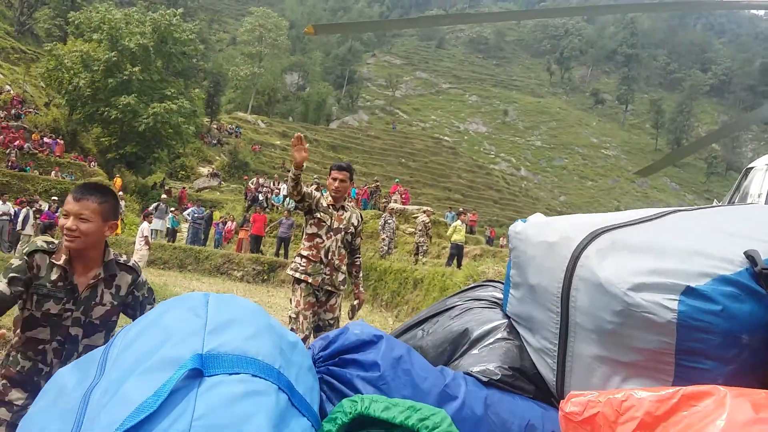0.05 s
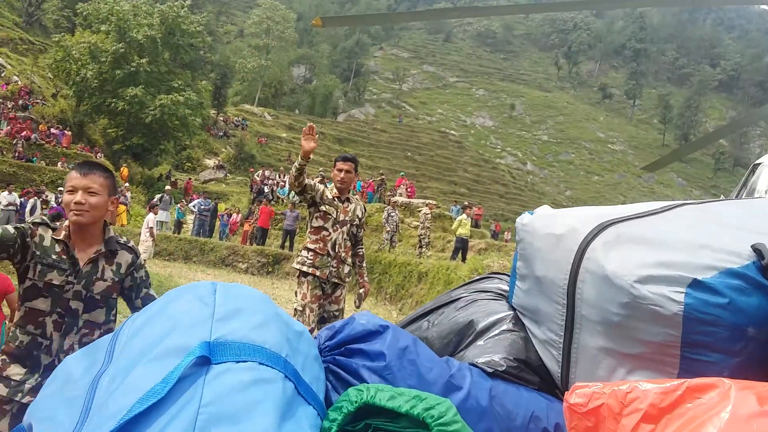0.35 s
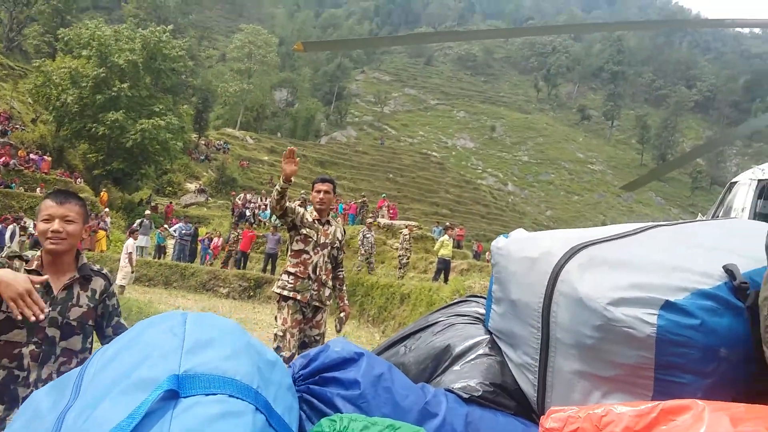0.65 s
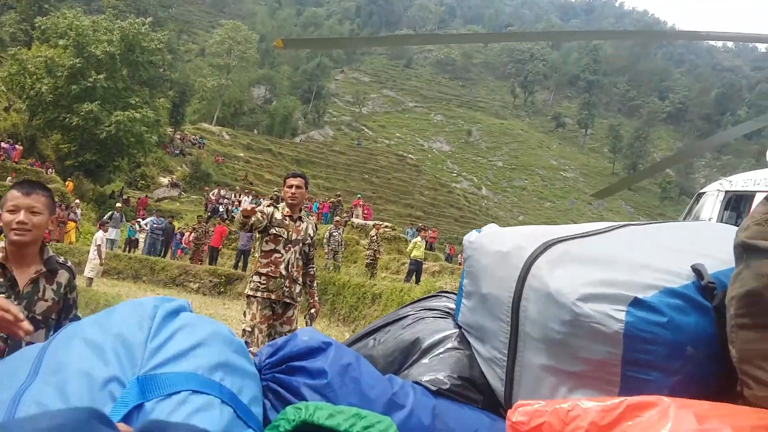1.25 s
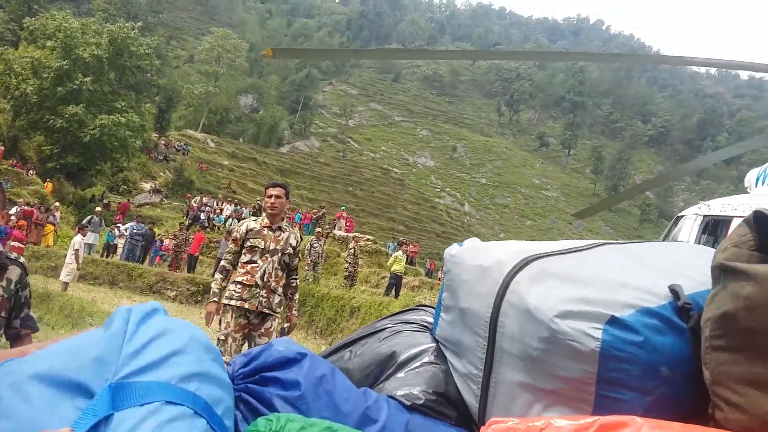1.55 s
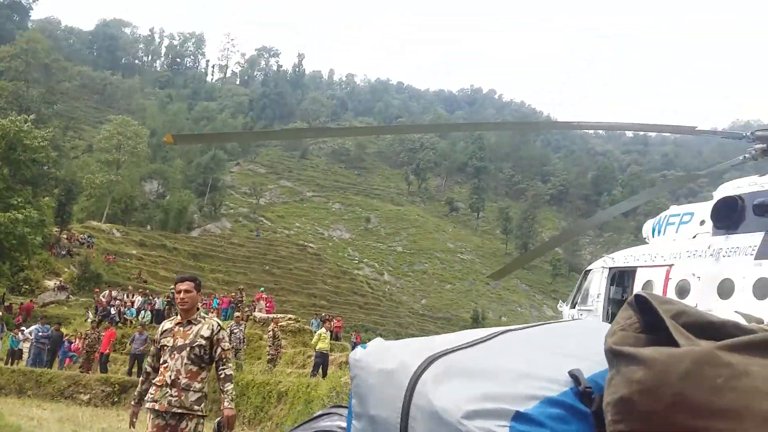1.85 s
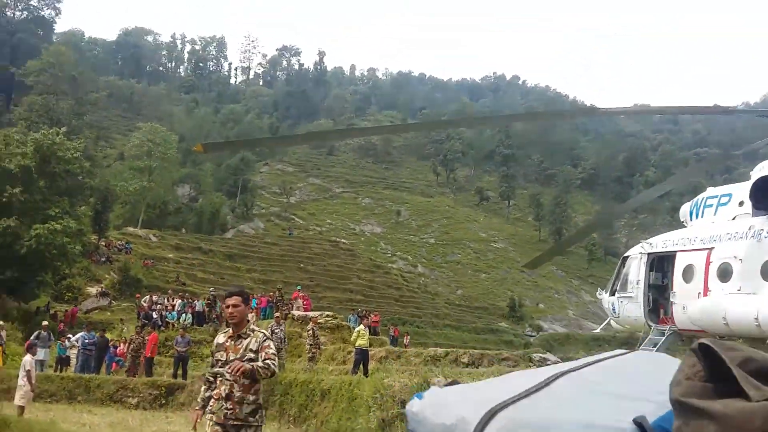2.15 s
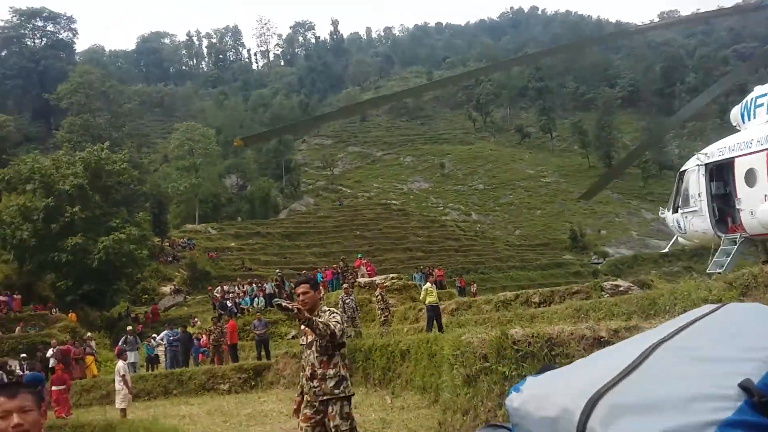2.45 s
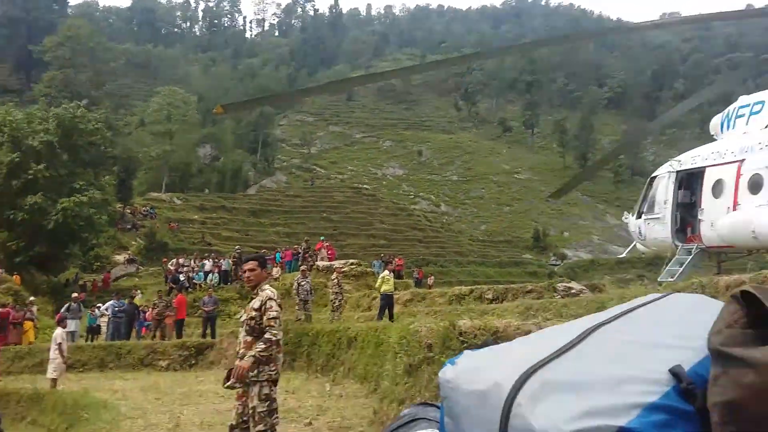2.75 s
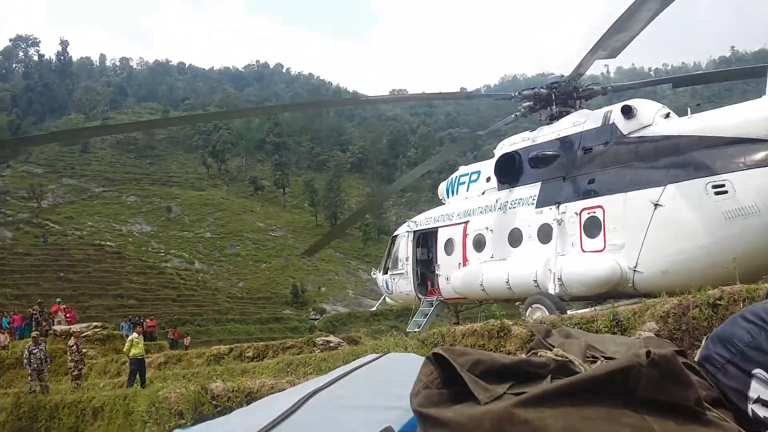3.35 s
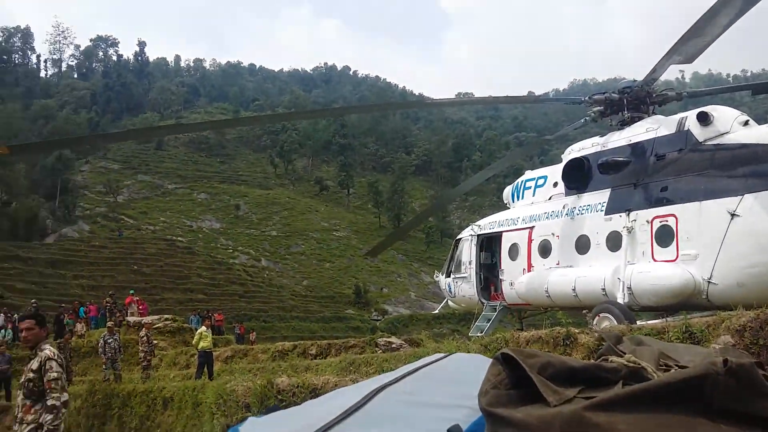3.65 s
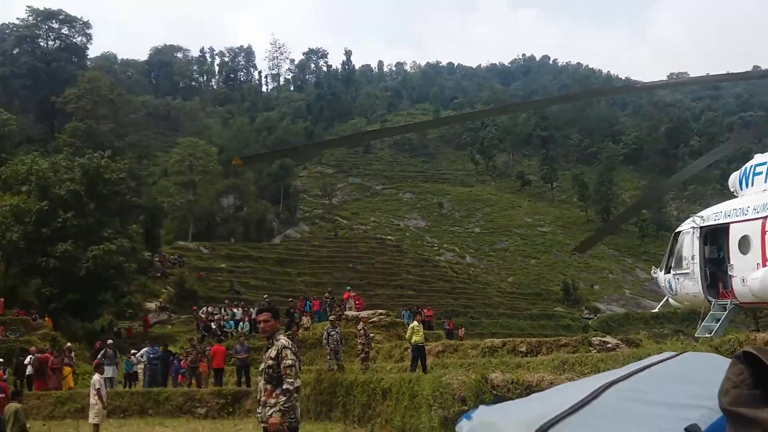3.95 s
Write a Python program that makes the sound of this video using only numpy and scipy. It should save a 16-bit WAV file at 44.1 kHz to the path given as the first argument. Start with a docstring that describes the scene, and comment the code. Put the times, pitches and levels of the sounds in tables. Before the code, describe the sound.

A helicopter's turbine exhaust roars loudly nearby for all four seconds, with a high hiss that swells and fades. At about 0.8 seconds a breathy whistle briefly slides down. From roughly 1.7 to 3.1 seconds the roar changes tone as the microphone turns toward the machine. Underneath are a faint gearbox hum and a low rotor wind rumble, with soft puffs on the microphone between 1 and 3.2 seconds.

```python
"""A helicopter's exhaust roars as it stands on a hillside, heard from behind a pile of luggage.
The roar changes tone as the microphone turns towards the machine and short echoes off the bags
and the ground move. The turbine intakes hiss, and a breathy whistle briefly slides down.
Underneath, the gearbox hums faintly and air pushed by the rotor puffs on the microphone."""
import sys
import numpy as np
from scipy import signal
from scipy.fft import rfft, irfft, next_fast_len
from scipy.io import wavfile
from scipy.ndimage import uniform_filter1d, map_coordinates

SR = 44100
rng = np.random.default_rng(int(sys.argv[2]) if len(sys.argv) > 2 else 0)


def master(y):
    """Save y as 16-bit WAV."""
    cut = np.clip(np.atleast_2d(y).T, -1, 1)
    pcm = np.round(cut * 32767)  # scale
    wavfile.write(sys.argv[1], SR, pcm.astype(np.int16))


N = 176400


def amp(db):
    """Turn a level in decibels (dB) into a number to multiply by."""
    return 10 ** (np.asarray(db) / 20)


def unit(x):
    """Scale a signal so that its average strength (rms) is 1."""
    return x / np.sqrt(np.mean(x ** 2) + 1e-20)


def along(points, hz):
    """Read between (frequency, value) points, giving each octave about the same room."""
    point_hz, values = np.transpose(points)
    return np.interp(np.log(hz + 1), np.log(point_hz + 1), values)


def curves(rows):
    """Join rows that start with a time into one curve per remaining column, a value per sample."""
    seconds, *columns = np.transpose(rows)
    return [np.interp(np.arange(N) / SR, seconds, column) for column in columns]


def wobble(per_s):
    """A smooth random curve that passes through per_s new values each second."""
    return map_coordinates(rng.standard_normal(1024), [np.arange(N) * per_s / SR], mode="mirror")


def filtered(x, response):
    """Turn each frequency in x up or down by the gain that response gives it."""
    size = next_fast_len(N + 8192)
    return irfft(rfft(x, size) * response(np.fft.rfftfreq(size, 1 / SR)), size)[..., :N]


def rush(tone, patchy_db):
    """Swirling air: noise with the given tone and random louder and softer patches, at strength 1."""
    spectrum = signal.stft(rng.standard_normal(N), nperseg=512)[2]
    patches = uniform_filter1d(rng.standard_normal(spectrum.shape), size=6, axis=0)  # blur in frequency
    patches = uniform_filter1d(patches, size=16, axis=1)  # blur in time
    noise = signal.istft(spectrum * amp(patchy_db * unit(patches)), nperseg=512)[1][:N]
    return unit(filtered(noise, lambda hz: amp(along(tone, hz))))


def delayed(x, lag_ms):
    """The same sound heard a little later; the delay may change as it plays."""
    return map_coordinates(x, [np.arange(N) - lag_ms * SR / 1000], mode="mirror")


def gearbox(waver=.7):
    """The gearbox hums a few faint tones that waver in loudness and pitch."""
    # Each row: pitch in Hz, level in dB.
    tones = [(296, -47), (331, -45.5), (640, -52)]
    t = np.arange(N) / SR
    hum = np.zeros(N)
    for hz, db in tones:
        swell = amp(2.2 * wobble(per_s=7.16))
        phase = 2 * np.pi * hz * t + waver * wobble(per_s=9.9)
        hum += amp(db) * unit(swell * np.sin(phase))
    return hum


def rotor_wash(rumble_db=-43):
    """Air pushed by the rotor makes a low, lumpy rumble and brief puffs on the microphone."""
    # The tone of the rumble. Each row: frequency in Hz, relative level in dB.
    tone = [(15, -36), (45, -26), (68, -3.5), (110, -1), (160, -5.5), (260, -14.5), (800, -50)]
    # Each row: time of a puff's peak in seconds, level in dB, half its length in seconds.
    puff_list = [(0.984, -36, 0.089), (1.12, -40, .02), (1.366, -32.5, .02), (1.925, -37, 0.022),
                 (2.11, -30, 0.017), (3.19, -33, 0.038)]
    t = np.arange(N) / SR
    puffs = sum(amp(db) * np.exp(-.5 * ((t - peak_s) / half_s) ** 2) for peak_s, db, half_s in puff_list)
    rumble = rush(tone, patchy_db=0.5)
    lumps = amp(rumble_db + 3.4 * wobble(per_s=24))
    return rumble * np.hypot(lumps, puffs)  # their powers add


def falling_whistle(width_hz=110):
    """A narrow band of the roar briefly slides down in pitch, like a breathy whistle."""
    # Each row: time in seconds, centre pitch in Hz, level in dB.
    glide = [(.68, 3150, -45), (.75, 3030, -27), (.8, 2860, -21.5), (.85, 2690, -22), (.89, 2620, -45)]
    hz, level_db = curves(glide)
    slow_noise = filtered(rng.standard_normal((2, N)), lambda f: 1 / (1 + (f / width_hz) ** 2))
    phase = 2 * np.pi * np.cumsum(hz) / SR
    whistle = slow_noise[0] * np.cos(phase) + slow_noise[1] * np.sin(phase)  # lift the noise to the pitch
    return unit(whistle) * amp(level_db)


def intake_hiss(flutter_db=0.58):
    """The turbine intakes hiss in three bands that swell and fade, sharing a flutter and an echo."""
    # How each band swells. Each row: time in seconds, level in dB before the band's offset is added.
    low_levels = [(0.0, -17.5), (0.21, -23.5), (0.37, -19.5), (0.42, -27), (0.52, -19.5), (1.5, -21.5),
                  (1.64, -24), (1.93, -16.5), (1.97, -18), (2.04, -14.5), (2.31, -19), (2.66, -22),
                  (2.71, -25.5), (2.9, -24), (3.16, -13.5), (3.72, -23), (3.92, -16), (4.0, -22)]
    main_levels = [(0.0, -16), (0.02, -19), (0.13, -16), (0.3, -20), (0.44, -16.5), (0.58, -20),
                   (0.63, -15), (0.81, -16.5), (0.87, -11.5), (1.27, -12.5), (1.34, -9.5), (1.41, -15),
                   (1.98, -12), (2.03, -16), (2.09, -13), (2.63, -14.5), (2.71, -19), (2.77, -17),
                   (2.85, -21), (3.12, -11), (3.45, -17), (3.54, -12.5), (3.71, -24), (3.77, -16.5),
                   (3.93, -14.5), (4.0, -15.5)]
    top_levels = [(0.0, -32), (0.01, -29), (0.61, -31), (1.0, -24), (1.48, -27), (1.96, -23.5), (2.07, -28),
                  (2.23, -22), (2.41, -24), (2.49, -31), (2.57, -25), (2.95, -29), (2.97, -24), (2.99, -29),
                  (3.48, -29), (3.58, -28), (3.65, -32), (4.0, -31)]
    # The tone of each band. Each row: frequency in Hz, relative level in dB.
    low_tone = [(3000, -48), (4600, -17), (5500, -8), (6200, -1.5), (7100, 1), (7800, -3.5), (9000, -29),
                (12000, -60)]
    main_tone = [(4500, -29), (6800, -19.5), (7700, -1.5), (8400, 0.5), (9800, -1), (11000, -5.5),
                 (12000, -10), (13200, -26), (16000, -45)]
    top_tone = [(9000, -48), (11800, -4), (12800, 6), (14200, 3), (15700, 3), (18000, -25)]
    # A very near echo hollows the hiss. Each row: time in seconds, delay in milliseconds, strength 0-1.
    near_echo = [(0, 0.64, 0.14), (.55, .655, 0.37), (.85, 0.66, 0.06), (1.3, 0.618, 0.13), (2.3, .84, 0),
                 (2.8, 0.85, .33), (3.15, 0.76, 0), (4, 0.99, 0)]
    bands = [(low_levels, low_tone, 0.37), (main_levels, main_tone, 0.3), (top_levels, top_tone, -1.5)]
    hiss = np.zeros(N)
    for levels, tone, offset_db in bands:
        level_db, = curves(levels)
        hiss += amp(level_db + offset_db) * rush(tone, patchy_db=1.38)
    lag_ms, strength = curves(near_echo)
    hollow_hiss = hiss + strength * delayed(hiss, lag_ms)
    return hollow_hiss * amp(flutter_db * wobble(per_s=24.17))


def exhaust_roar(turn_start_s=1.68, turn_end_s=3.12, offset_db=0.6, flutter_db=0.78):
    """The exhaust's fluttering roar changes tone as the microphone turns and two short echoes move."""
    # Each row: time in seconds, level in dB before the offset is added.
    levels = [(0, -15), (.28, -15), (.42, -16), (.8, -14.2), (.9, -16), (1.22, -15.5), (1.5, -16.7),
              (1.9, -16.5), (2.4, -16), (3.3, -16), (3.8, -15.5), (4, -16)]
    # The tone with the microphone turned away, then facing the machine.
    # Each row: frequency in Hz, relative level in dB.
    away_tone = [(30, -49), (130, -23), (190, -7.5), (310, -8), (530, -12.5), (950, -8), (1300, -7.5),
                 (1480, -1), (1640, 1.5), (1850, -2), (2090, 1.5), (2450, -4.5), (2850, -3), (3180, 0),
                 (3480, -6), (3800, -3.5), (4150, -6.5), (4450, -9), (5300, -19), (7000, -38), (12000, -60)]
    facing_tone = [(30, -42), (130, -16), (190, -8), (310, -6.5), (520, -10), (680, -9), (790, -10.5),
                   (1000, -4), (1350, -2.5), (1700, -2), (2050, -0.5), (2450, -1.5), (3150, -0.1),
                   (3700, -6), (4250, -18), (4900, -17), (7000, -25), (12000, -60)]
    # Each row: time in seconds, then the luggage echo's and the ground echo's delay in milliseconds.
    echo_delays = [(0, 1.12, 3.3), (.6, 1.1, 2.4), (1.3, 1, 2.8), (1.7, 1.25, 2.64), (2.3, 1.35, 3.2),
                   (2.85, 1.52, 3.11), (3.4, 1.53, 3), (4, 1.54, 3.06)]
    turn, = curves([(turn_start_s, 0), (turn_end_s, 1)])
    turn = np.clip(turn, 0, 1)
    away = rush(away_tone, patchy_db=0.84)
    facing = rush(facing_tone, patchy_db=1.07)
    roar = np.sqrt(1 - turn) * away + np.sqrt(turn) * facing
    # Echoes this short strengthen some frequencies and weaken others.
    luggage_ms, ground_ms = curves(echo_delays)
    roar = roar + .16 * delayed(roar, luggage_ms) + .11 * delayed(roar, ground_ms)
    level_db, = curves(levels)
    return unit(roar) * amp(level_db + offset_db + flutter_db * wobble(per_s=48))


def scene():
    """All the sounds reach one microphone, so left and right are the same."""
    mono = exhaust_roar() + falling_whistle() + intake_hiss() + gearbox() + rotor_wash()
    return np.array([mono, mono])


def record(dry):
    """The overloaded recorder flattens the tallest peaks and cuts off the highest treble."""
    ceiling, top_hz = .74, 15750
    rounded = dry / (1 + np.abs(dry / ceiling) ** 8) ** (1 / 8)
    return filtered(rounded, lambda hz: hz < top_hz)


dry = scene()
out = record(dry)
master(out)
```